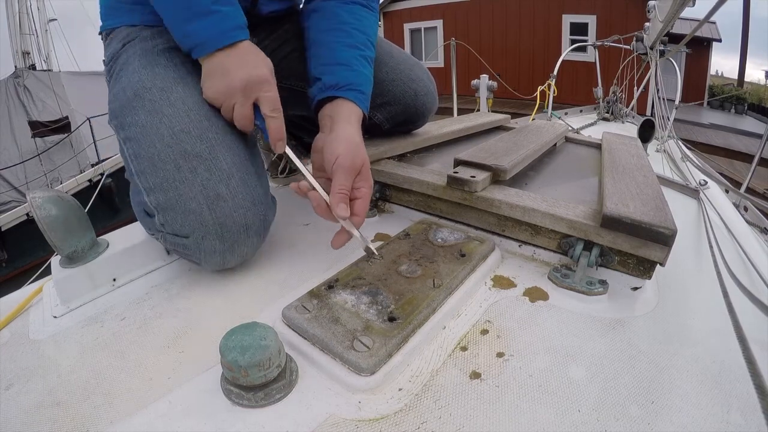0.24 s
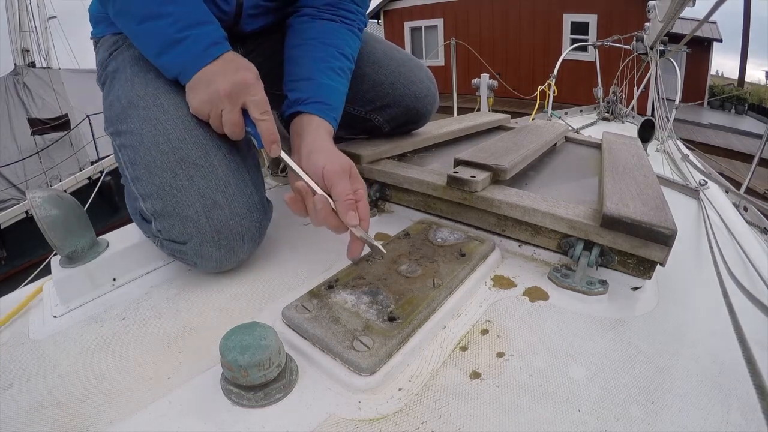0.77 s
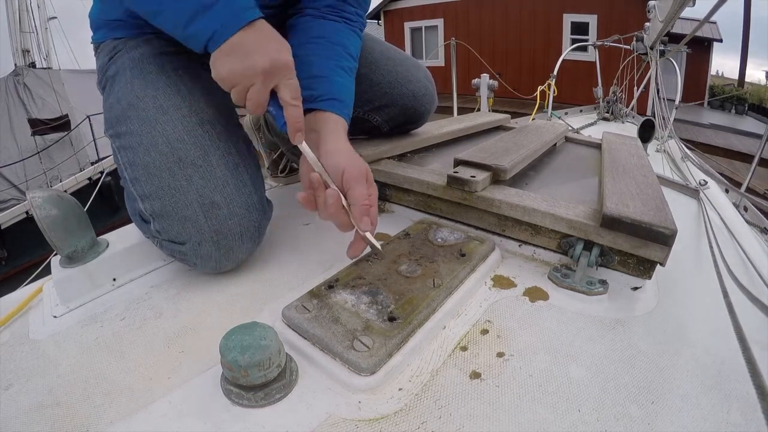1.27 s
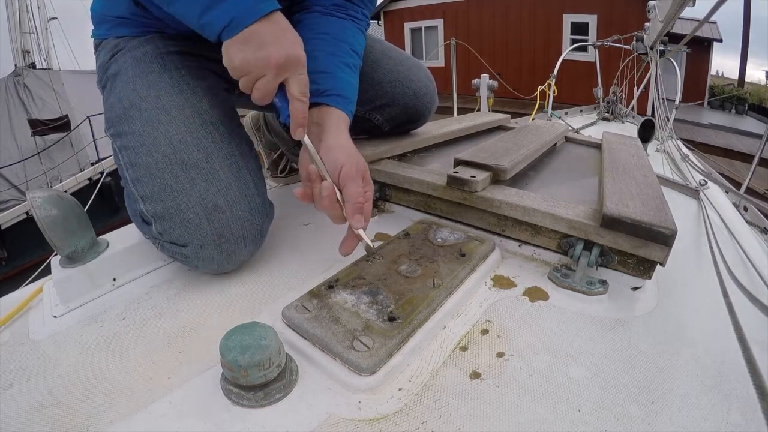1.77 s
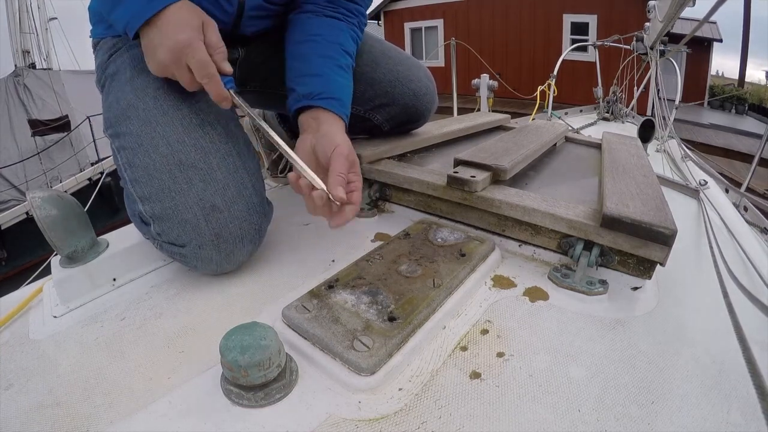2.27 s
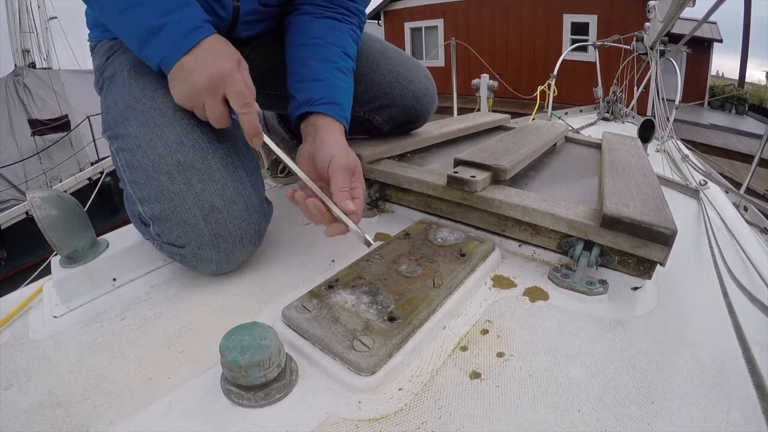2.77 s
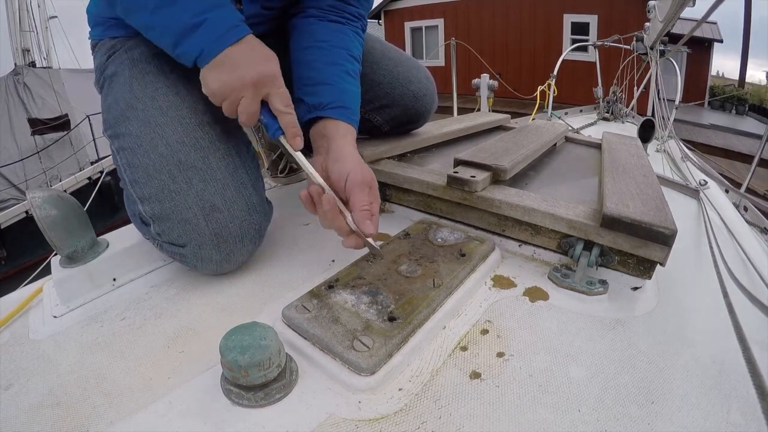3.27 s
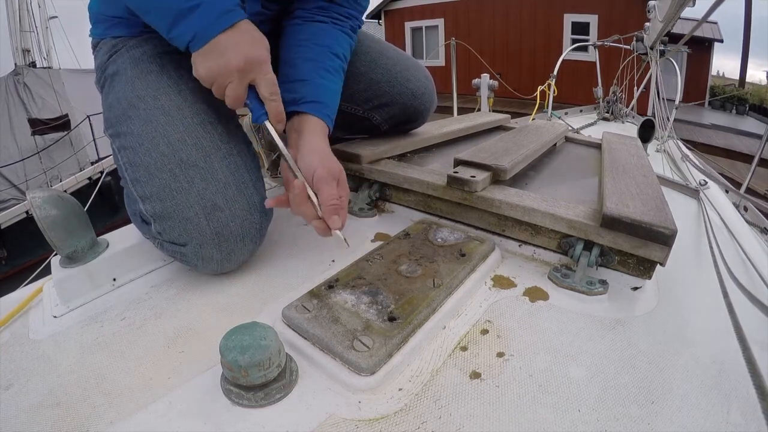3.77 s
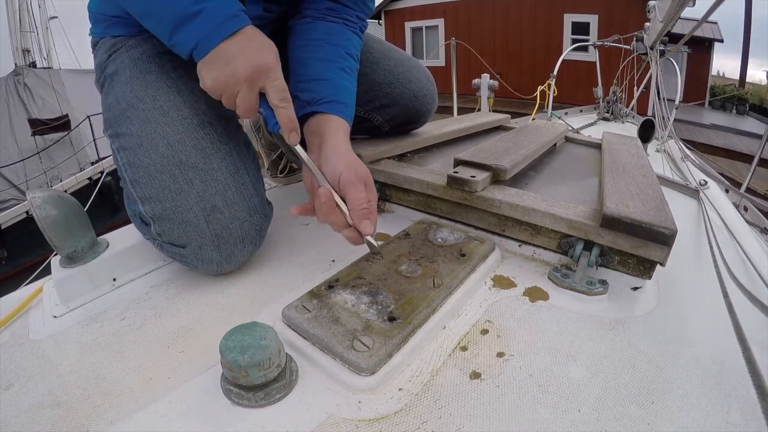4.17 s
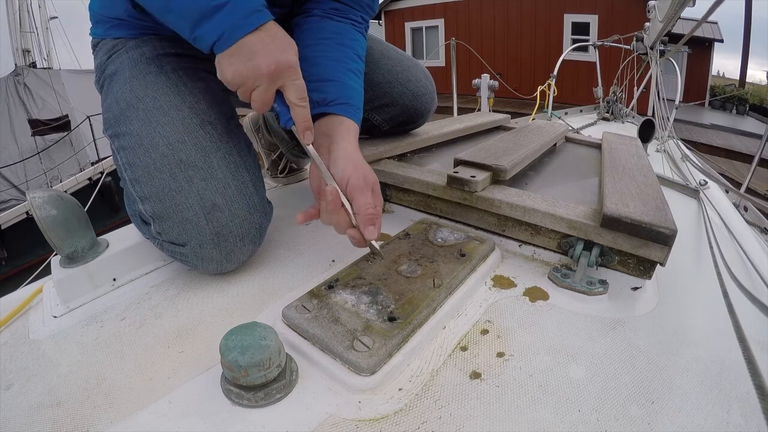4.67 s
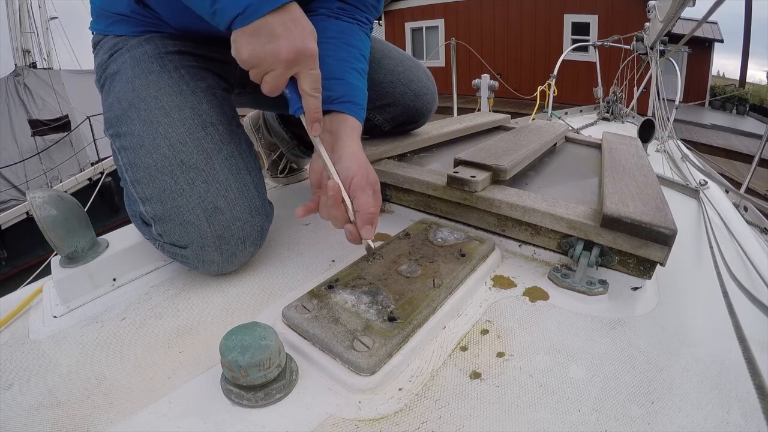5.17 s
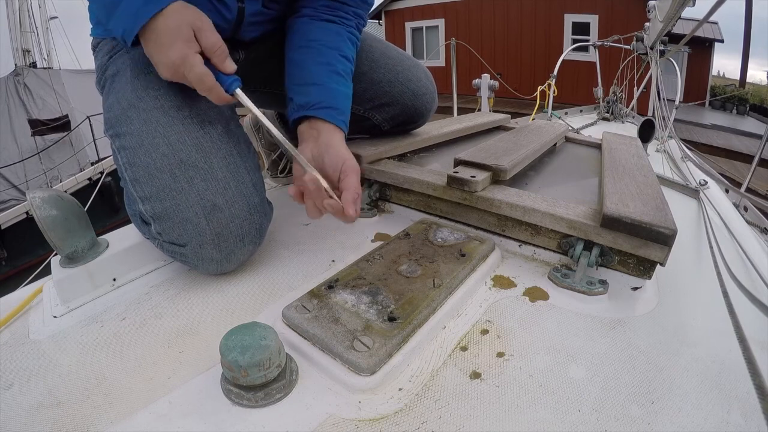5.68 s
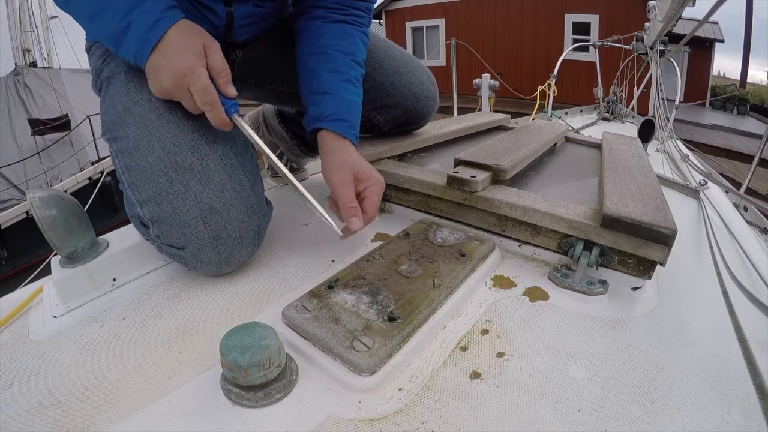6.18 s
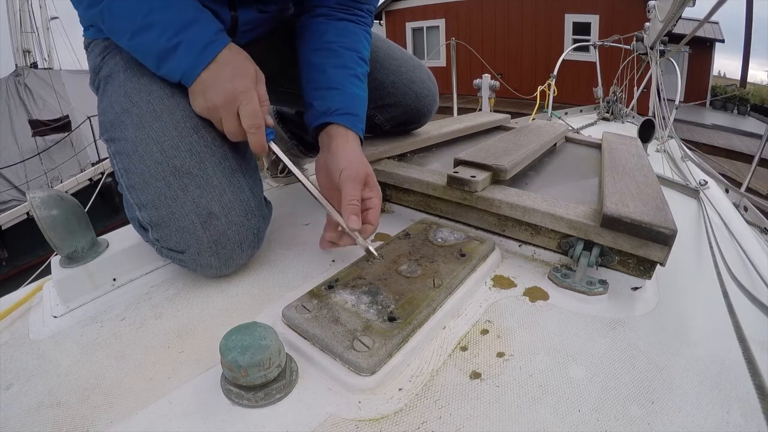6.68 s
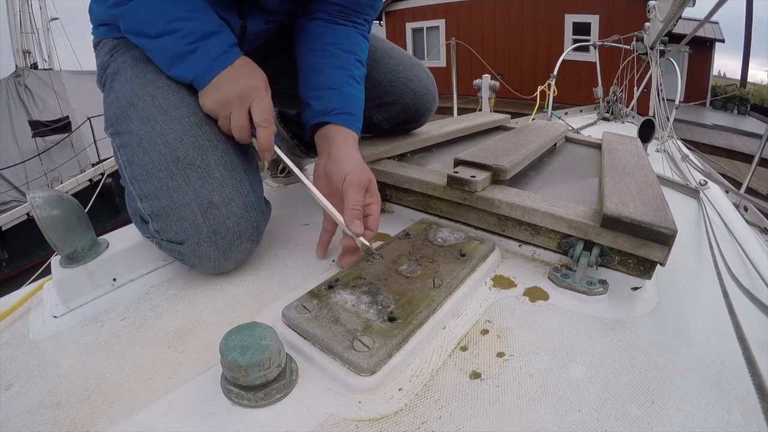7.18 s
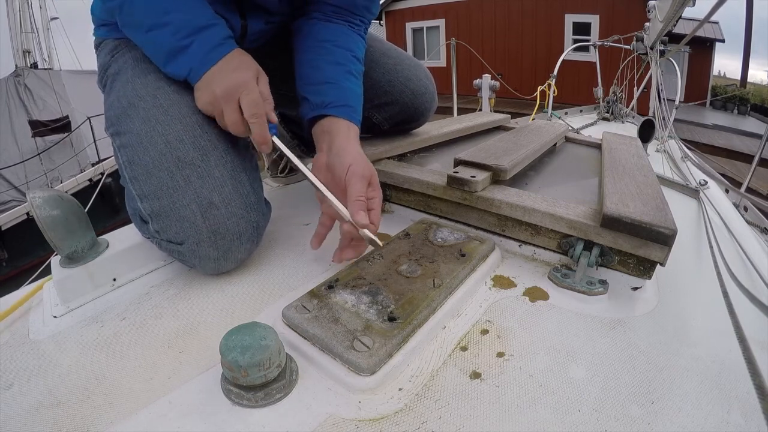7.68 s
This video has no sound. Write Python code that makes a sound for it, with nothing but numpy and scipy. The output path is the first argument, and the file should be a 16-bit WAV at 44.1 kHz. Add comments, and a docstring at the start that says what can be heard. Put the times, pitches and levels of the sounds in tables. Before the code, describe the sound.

A close microphone on a boat deck in open air. Low lumpy rumble and a soft distant roar run throughout, the roar slowly growing duller and slightly louder. Jacket fabric swishes at once and at 0.2 s; a strong, very deep thump lands at 0.4 s. A faint tick at 0.6 s precedes light gritty clicks around 1.0-1.1 s. Harder picks at 1.8 and 2.0 s knock the plate and hollow deck, followed by sleeve rustle, a barely audible singing of the shank and soft low thumps until 2.7 s. Faint touches come at 3.0 s, firm scraping knocks at 3.6-3.75, a click at 4.4, then sharp picks at 5.1-5.4. Fabric moves around 5.5-6.3 with another faint shank slide. Bright clicks cluster at 6.65-6.75; tiny flakes snap at 7.05 and 7.5, with a last small tick at 7.65. A faint wavering hum rises at the end.

```python
"""A flat screwdriver picks at corroded screw heads in a metal plate on a boat deck, worked by someone kneeling.
Skids of the tip are bursts of grit that ring the modes of the blade; blows ring the plate and the hollow deck.
The shank sings faintly through the fingers, flakes of corrosion snap off and a short dull tail follows the tool.
Jacket sleeves swish as filtered noise that swells with each stroke and jerks with each blow.
Under it lie a low rumble, soft thumps of deep sine, a distant roar of coloured noise and a faint wavering hum."""
import sys
import numpy as np
from scipy import signal
from scipy.fft import rfft, irfft
from scipy.io import wavfile
from scipy.ndimage import uniform_filter1d

SR = 44100
rng = np.random.default_rng(int(sys.argv[2]) if len(sys.argv) > 2 else 0)


def log_audio(samples):
    """Write samples as a 16-bit WAV file to the path given in sys.argv[1]."""
    # one column per channel
    frames = np.atleast_2d(samples).T
    # limit to full scale, then quantise
    limited = np.clip(frames, -1, 1)
    pcm = np.round(limited * 32767).astype(np.int16)
    wavfile.write(sys.argv[1], SR, pcm)


N = 350374
TIME = np.arange(N) / SR  # s

# modes of the blade with its tip pressed down, main mode first:
# (frequency [Hz], relative level [dB], t60 [s])
BLADE_MODES = [(3110, 2.5, 0.012), (3400, -16, 0.016), (4050, -20, 0.023), (4300, -8, 0.011),
               (4595, -11, 0.013), (5030, -19, 0.021), (6130, -23, .014), (6790, -18, 0.013),
               (9450, -42, 0.011)]
# blows of the tip on the plate, levels before trim:
# (time [s], level of the plate [dB], push on the deck [dB])
BLOWS = [(.969, -51, -44.5), (1.096, -49, -45.5), (1.831, -32, -32.5), (1.998, -36.5, -30.5),
         (2.007, -36, -37.5), (2.016, -34, -35), (3.011, -65, -45.5), (3.065, -62, -44), (3.579, -36, -30),
         (3.725, -34, -25.5), (3.741, -36, -32.5), (3.752, -38, -35.5), (4.389, -50, -46),
         (5.095, -59, -45.5), (5.2442, -33.5, -31), (5.361, -49, -36.5), (6.66, -37, -38),
         (6.728, -48.5, -45), (6.757, -46.5, -41)]


def amp(db):
    """Decibels to gain."""
    return 10 ** (np.asarray(db) / 20)


def unit(x):
    """Scales to rms 1."""
    return x / np.sqrt(np.mean(x ** 2) + 1e-20)


def held(x, seconds):
    """Scales a short sound to the energy of rms 1 held for so many seconds."""
    return x * np.sqrt(seconds * SR / (np.sum(x ** 2) + 1e-20))


def curve(rows, t):
    """A control curve at the times t."""
    return np.interp(t, *np.transpose(rows))


def colour(points, hz):
    """Gain of a spectrum table at the given frequencies, read along log frequency."""
    f, db = np.transpose(points)
    return amp(np.interp(np.log(hz + 1), np.log(f), db))


def tinted(x, spectrum):
    """Filters x by a spectrum table."""
    gain = colour(spectrum, np.fft.rfftfreq(len(x), 1 / SR))
    return irfft(rfft(x) * gain, len(x))


def add(mix, s, sound):
    """Mixes a sound in at time s."""
    part = mix[max(round(s * SR), 0):][:len(sound)]
    part += sound[:len(part)]


def drift(hz):
    """Slow random wander of rms 1, up to about hz changes a second."""
    lowpass = np.exp(-(np.fft.rfftfreq(N, 1 / SR) / hz) ** 2)
    return unit(irfft(rfft(rng.standard_normal(N)) * lowpass, N))


def ring(modes, bright_db=0, scatter_db=2, rise=0.00014, size=8000):
    """Modes that build up over a moment and die; each point of contact weights them a little differently."""
    hz, db, t60 = np.transpose(modes)[:, :, None]
    t = np.arange(size) / SR
    tilt_db = bright_db * np.log2(hz / hz[0])
    weight = amp(db + tilt_db + scatter_db * rng.standard_normal(hz.shape))
    swing = np.sin(2 * np.pi * (hz * t + rng.random(hz.shape)))
    decay = np.exp(-np.log(1000) * t / t60)
    return (weight * decay * swing).sum(0) * (1 - np.exp(-t / rise))


def grit(length, limit=1.7, size=1024, count=12):
    """Force on a skidding tip: a short dense noise burst, even in spectrum, with its peaks clipped."""
    contact = np.arange(size) / SR < length
    force = rng.standard_normal(size)
    # alternately flatten the spectrum and clip the peaks
    for _ in range(count):
        bins = rfft(force * contact)
        force = irfft(bins / (abs(bins) + 1e-9))
        force = np.clip(force / force[contact].std(), -limit, limit)
    return force * contact


def skid(length, db, bright_db, hz, contact_hz, ring_db, crunch_db, size=256):
    """Grit rings the blade and the screw edge that it bites, and crackles by itself; gives (delay s, sound) parts."""
    # breaking corrosion: (frequency [Hz], relative level per Hz before the skid's tilt [dB])
    crust_spectrum = [(700, -40), (1350, -15), (1900, -1), (2250, 3.5), (2600, 0.5), (3300, -7.5),
                      (4400, -9.5), (5300, -4.5), (6800, -19), (7800, -22), (15000, -31)]
    contact_t60 = 0.013  # s
    crust_trim_db = 3.0
    snap = 0.18  # share of the blade's brightness that tilts the crackle
    lasts = length + 0.0007  # s; the ring outlasts the skid

    modes = [(hz, *BLADE_MODES[0][1:])] + list(BLADE_MODES[1:])  # grip and pressure move the main mode
    blade = signal.fftconvolve(grit(length), ring(modes, bright_db, scatter_db=1.0, rise=0.00028))
    contact = signal.fftconvolve(grit(length), ring([(contact_hz, 0, contact_t60)], rise=0.00011))
    # a sharper catch snaps higher
    crackle = [(f, level + snap * bright_db * np.log2(f / hz)) for f, level in crust_spectrum]
    crust = tinted(np.pad(grit(length), size), crackle)
    return [(0, amp(db) * held(blade, lasts)),
            (0, amp(db + ring_db) * held(contact, lasts)),
            (-size / SR, amp(db + crunch_db + crust_trim_db) * held(crust, lasts))]


def rebounds():
    """Skid rows for the one light second touch of the tip after each blow that pushes the deck hard."""
    hard_db = -33  # push on the deck before trim
    delay, length = .022, .0015  # s
    relative_db = -17  # to the blow on the plate before trim
    bright_db = 3  # dB per octave
    edge_hz, edge_ring_db, edge_crunch_db = 2800, -8, -11  # the screw edge that a rebound meets
    main_hz = BLADE_MODES[0][0]
    return [(s + delay, length, blow_db + relative_db, bright_db, main_hz, edge_hz, edge_ring_db, edge_crunch_db)
            for s, blow_db, push_db in BLOWS if push_db > hard_db]


def skids():
    """Every skid and rebound of the tip, each a grit force driving blade, screw edge and crust."""
    # skids of the tip: (time [s], length [s], level [dB], brightness [dB per octave],
    # main mode of the blade [Hz], ring of the contact [Hz], level of that ring relative to the blade [dB],
    # crunch of the crust relative to the blade, before trim [dB])
    skid_rows = [(.621, .0032, -53, -3, 3050, 4600, -5, -7), (.9683, 0.0033, -61, 4, 3200, 2420, 4, 1),
                 (1.054, .0036, -56, -7, 3250, 2470, -6, -7),
                 (1.0938, 0.0017, -32, -5, 3250, 4500, -4.5, -15),
                 (1.0955, .0025, -42.5, -8, 3130, 1990, 4.5, -24),
                 (1.655, 0.018, -60, 3, 3270, 3640, -2, -5), (1.81, 0.011, -53.5, 5, 3080, 5540, -2, -9),
                 (1.8283, 0.0037, -38, -1, 2970, 3550, -5, -10),
                 (1.983, 0.0035, -47, 2, 3140, 4360, -7, -7), (1.9965, 0.0029, -41.5, 0, 3180, 3660, 0, -8),
                 (2.0046, 0.0079, -39.5, 8, 3100, 3730, -2, -7),
                 (2.012, .0072, -40, 12, 3050, 3830, -3, -5), (3.014, 0.0029, -56, 1, 3170, 1660, 5, -9),
                 (3.067, 0.0036, -56.5, -1, 3240, 1990, -9, -12),
                 (3.563, 0.0063, -50.5, 6, 3140, 4250, -4, -7),
                 (3.5766, 0.0023, -33, -9, 2980, 3900, -8, -7.5),
                 (3.725, 0.0014, -36, -4, 3050, 1930, -8, -12),
                 (3.737, 0.0094, -44, -5, 2900, 4500, -8, -3),
                 (3.747, .0068, -33.5, -12, 2940, 4500, -8, -8.5),
                 (4.388, 0.002, -42, -8, 3030, 1760, 0.5, -11),
                 (4.401, 0.012, -55.5, -6, 2960, 2020, -1, -14),
                 (4.992, .0034, -53.5, 0, 3150, 5030, -1.5, -9), (5.098, 0.022, -67, 10, 3090, 4890, 1, -9),
                 (5.234, .002, -44.5, 16, 3100, 4240, 1, -8),
                 (5.242, .0024, -31.5, -6, 2910, 1650, -12, -14),
                 (5.347, 0.014, -52, -1, 2880, 2230, -3, -6), (5.369, .0016, -36, 4, 2850, 4510, -6, -12),
                 (6.659, 0.0041, -32, 1, 3070, 4650, -5, -22),
                 (6.6634, 0.006, -33.5, -4, 3130, 4700, -6, -15),
                 (6.7258, .0019, -38.5, 17, 3190, 2200, -1, -8),
                 (6.731, .006, -43.5, 10, 3130, 1790, -.5, -7),
                 (6.7565, 0.0019, -48.5, -2, 3080, 4070, -3, -8),
                 (7.4904, 0.0026, -50.5, 23, 3000, 5300, -3, -17),
                 (7.6466, .0022, -50, -8, 2910, 3550, -11, -17)]
    out = np.zeros(N)
    for s, *row in list(skid_rows) + rebounds():
        for delay, sound in skid(*row):
            add(out, s + delay, sound)
    return out


def knocks(plate_trim_db=0.5, deck_trim_db=1.0):
    """The tip lands on the plate, which shakes the hollow deck under it; both ring in their own modes."""
    # modes of the plate: (frequency [Hz], relative level [dB], t60 [s])
    plate_modes = [(729, -4.5, 0.037), (919, 2, 0.034), (956, -1, 0.052), (1096, -12, 0.085),
                   (1164, 2, 0.03), (1480, -9, .025), (1714, -13, 0.038), (2030, -15, 0.045),
                   (2230, -14.5, 0.028)]
    # modes of the hollow deck: (frequency [Hz], relative level [dB], t60 [s])
    deck_modes = [(70.3, -1, 0.21), (103, -4.5, 0.1), (159, -1, 0.15), (220.8, -1.5, 0.12),
                  (282.4, -4.5, 0.13), (339, -8.5, 0.084), (382, -1, 0.091), (472.5, -7, 0.073)]
    out = np.zeros(N)
    for s, blow_db, push_db in BLOWS:
        plate = held(ring(plate_modes, scatter_db=4.0, rise=0.00067), 0.0087)
        deck = held(ring(deck_modes, scatter_db=4.0, rise=0.0011), 0.016)
        add(out, s, amp(blow_db + plate_trim_db) * plate)
        add(out, s, amp(push_db + deck_trim_db) * deck)
    return out


def slides(t60=0.011):
    """The shank slides through the fingers: light rubbing keeps one of its modes faintly singing."""
    # slides of the shank: (start [s], length [s], level before the fades [dB], ring [Hz])
    slide_rows = [(2, 0.59, -66, 4850), (6.073, 0.55, -63, 2980)]
    out = np.zeros(N)
    for s, length, db, hz in slide_rows:
        rub = rng.standard_normal(round(length * SR))
        sung = signal.fftconvolve(rub, ring([(hz, 0, t60)]))[:len(rub)]
        add(out, s, amp(db) * unit(sung) * np.hanning(len(rub)))
    return out


def flakes(length=0.0016, size=256):
    """Flakes of corrosion break off in tiny, dry, bright snaps, one of them along with a skid."""
    # flakes: (time [s], level [dB])
    flake_rows = [(1.539, -61), (7.046, -57), (7.491, -61)]
    # colour of a snap: (frequency [Hz], relative level per Hz [dB])
    snap_spectrum = [(2500, -30), (4500, -3), (7000, -3), (10000, 1), (15000, -10)]
    out = np.zeros(N)
    for s, db in flake_rows:
        snap = tinted(np.pad(grit(length), size), snap_spectrum)
        add(out, s - size / SR, amp(db) * held(snap, 0.0043))
    return out


def reflections(x, wet_db=-13, t60=0.06, dull_hz=3000, size=12000):
    """The deck and cabin scatter a short, dull tail into the open air: sparse random echoes that die away."""
    t = np.arange(size) / SR
    sparse = (rng.random(size) < .08) * (t > .003)
    taps = rng.standard_normal(size) * sparse * np.exp(-np.log(1000) * t / t60)
    taps = signal.lfilter(*signal.butter(1, dull_hz, fs=SR), taps / np.linalg.norm(taps))
    return amp(wet_db) * signal.fftconvolve(x, taps)[:N]


def swell(s, rise, fade):
    """A rounded hump of height 1 at time s, with its own rise and fade times."""
    return np.exp(-((TIME - s) / np.where(TIME < s, rise, fade)) ** 2)


def sleeve_levels():
    """Gains of swish and cloth: each stroke of the arms swells and fades, and each blow adds a brief jerk."""
    # strokes of the arms, levels before trim: (fastest moment [s], swell [s], fade [s],
    # swish [dB], body of the cloth relative to the swish [dB])
    stroke_rows = [(.01, .1, 0.15, -58, 7.5), (.22, 0.053, 0.089, -53.5, 6), (.49, 0.7, 0.22, -65, 7.5),
                   (1.335, 0.086, .11, -59, 3.5), (1.68, 0.023, 0.038, -67.5, 13.5),
                   (1.83, 0.036, 0.028, -67, 3), (2.1, .11, .23, -56.7, 3), (2.51, .09, 0.11, -67.5, 5),
                   (2.69, 0.092, 0.17, -59.5, 2), (2.86, 0.18, 0.19, -61, 3), (3.375, .115, 0.15, -60.5, 6),
                   (3.77, 0.023, 0.11, -57.5, 4), (3.99, .07, .115, -65, 3.5),
                   (4.723, 0.058, .08, -58.5, 6.5), (4.85, .05, 0.14, -67.5, 5),
                   (5.46, 0.12, 0.19, -56.5, 3), (5.845, 0.11, 0.086, -59.5, 3),
                   (5.958, 0.018, .035, -57, -3), (6.32, 0.24, .145, -58, 2), (6.54, .085, 0.092, -62, 5.5),
                   (6.86, 0.22, 0.38, -73, 9), (7.22, 0.047, 0.16, -64, 2.5), (7.83, 0.23, .2, -65, 7)]
    still_swish_db, still_cloth_db = -74, -67  # before trim; the sleeves never quite rest
    jolt_swish_db, jolt_cloth_db = -41, -23  # before trim, relative to the push on the deck before trim
    jolt_swell, jolt_fade = 0.0059, .035  # s

    moves = [(s, rise, fade, db, db + body_db) for s, rise, fade, db, body_db in stroke_rows]
    moves += [(s, jolt_swell, jolt_fade, push_db + jolt_swish_db, push_db + jolt_cloth_db)
              for s, _, push_db in BLOWS]
    # the moves add as powers
    swish, cloth = amp(still_swish_db) ** 2, amp(still_cloth_db) ** 2
    for s, rise, fade, swish_db, cloth_db in moves:
        power = swell(s, rise, fade) ** 2
        swish = swish + amp(swish_db) ** 2 * power
        cloth = cloth + amp(cloth_db) ** 2 * power
    return np.sqrt(swish), np.sqrt(cloth)


def sleeves(swish_trim_db=1, cloth_trim_db=-2, flutter_db=1.0):
    """Smooth fabric slides on itself: a fine hiss over a duller rub, fluttering together as the folds pass."""
    # fine hiss of the fabric: (frequency [Hz], relative level per Hz [dB])
    swish_spectrum = [(1500, -25), (3000, -8), (4800, -2.5), (6500, 0), (8500, -2), (11000, -2.5),
                      (13500, -2), (15500, -5.5)]
    # duller rub of the cloth: (frequency [Hz], relative level per Hz [dB])
    cloth_spectrum = [(500, -35), (1200, 1.5), (2200, -1.5), (3100, 2), (3900, -0.5), (4700, 1), (6000, -3),
                      (8500, -11.5), (15000, -29)]
    swish_gain, cloth_gain = sleeve_levels()
    swish = swish_gain * amp(swish_trim_db) * unit(tinted(rng.standard_normal(N), swish_spectrum))
    cloth = cloth_gain * amp(cloth_trim_db) * unit(tinted(rng.standard_normal(N), cloth_spectrum))
    return (swish + cloth) * amp(flutter_db * drift(58))


def thumps():
    """A few cycles of deep pressure that swell and die."""
    # soft thumps: (middle [s], length [s], frequency [Hz], peak level [dB])
    thump_rows = [(0.218, 0.064, 202, -40.5), (0.27, 0.065, 39, -28.5), (0.415, 0.082, 36.8, -10.5),
                  (0.457, 0.039, 45.3, -21), (0.519, 0.13, 36, -30), (1.764, 0.098, 66, -33),
                  (1.868, 0.061, 66.4, -23.5), (2.283, 0.089, 35.6, -28), (2.377, 0.17, 36.4, -25),
                  (2.402, 0.036, 65.4, -27.5), (2.589, 0.15, 42.2, -25.5), (2.59, 0.077, 86, -34.5),
                  (2.725, 0.069, 41.5, -24.5), (3.753, .09, 40.4, -29.5), (5.268, 0.13, 43.7, -27.5),
                  (5.642, 0.075, 31.8, -30)]
    out = np.zeros(N)
    for s, length, hz, db in thump_rows:
        t = np.arange(-length / 2, length / 2, 1 / SR)
        hump = np.cos(np.pi * t / length) ** 2
        add(out, s - length / 2, amp(db) * hump * np.sin(2 * np.pi * hz * t))
    return out


def rumble(trim_db=2.5):
    """Lumpy low rumble: dark noise whose level wanders."""
    # colour of the rumble: (frequency [Hz], relative level per Hz [dB])
    rumble_spectrum = [(12, -4.5), (25, -3), (37, 4), (55, -1), (80, -6), (110, -7), (150, -13.5),
                       (230, -21), (350, -26), (600, -28.5), (1500, -56.5)]
    # course of the rumble: (time [s], level before trim and wander [dB])
    rumble_level = [(0, -44), (.45, -42), (1.3, -46.5), (1.9, -41), (2.9, -47), (3.65, -41.5), (4.8, -46),
                    (5.3, -42), (6, -47), (6.7, -42.5), (7.94, -45)]
    level_db = curve(rumble_level, TIME) + trim_db + 1.12 * drift(4.0)
    return amp(level_db) * unit(tinted(rng.standard_normal(N), rumble_spectrum))


def noise(spectrum, patchy_db, shift, size):
    """Noise of rms 1 with a given spectrum, drifting patches and a sliding colour."""
    overlap = size * 3 // 4
    hz, t, bins = signal.stft(rng.standard_normal(N), SR, nperseg=size, noverlap=overlap)
    patches = uniform_filter1d(rng.standard_normal(bins.shape), size=14, axis=0)  # across frequency
    patches = unit(uniform_filter1d(patches, size=10, axis=1))  # along time
    bins = bins * colour(spectrum, hz[:, None] / curve(shift, t)) * amp(patchy_db * patches)
    return unit(signal.istft(bins, nperseg=size, noverlap=overlap)[1][:N])


def roar(trim_db=2):
    """A far roar: patchy noise that slowly darkens as its spectrum slides down."""
    # colour of the roar: (frequency before the shift [Hz], relative level per Hz [dB])
    roar_spectrum = [(100, 1), (300, -2), (480, -4.5), (700, 0.5), (950, 1.5), (1300, -5), (2000, -12.5),
                     (3000, -19.5), (6000, -29.5), (15000, -50)]
    # slide of the colour: (time [s], factor on the roar's frequencies [ratio])
    roar_shift = [(0, 1.087), (4.5, 0.99), (6, 0.91), (7.9, 0.92)]
    # course of the roar: (time [s], level before trim [dB])
    roar_level = [(0, -53), (.6, -54.5), (1.6, -52.5), (2.8, -52.5), (5.2, -51), (7.94, -50)]
    far = noise(roar_spectrum, patchy_db=0.9, shift=roar_shift, size=2048)
    return amp(curve(roar_level, TIME) + trim_db) * far


def hum():
    """A faint hum of a few sines, each wavering in pitch, all wavering in level together."""
    # partials of the hum: (middle frequency [Hz], relative level [dB])
    hum_partials = [(98, -5.5), (157, -1), (211, -14.5)]
    # course of the hum: (time [s], level before the waver [dB])
    hum_level = [(0, -67.5), (3.8, -54), (6.3, -56.5), (7.2, -58.5), (7.55, -50.5), (7.9, -47)]
    tone = np.zeros(N)
    for hz, db in hum_partials:
        pitch = hz * (1 + 0.0126 * drift(5.87))
        tone += amp(db) * np.sin(2 * np.pi * np.cumsum(pitch) / SR)
    return amp(curve(hum_level, TIME) + 2 * drift(5)) * unit(tone)


def scene():
    """The tool close by with its short tail, the worker's sleeves and the harbour air."""
    tool = skids() + knocks() + slides()
    worker = tool + reflections(tool) + flakes() + sleeves()
    background = thumps() + rumble() + roar() + hum()
    return (worker + background)[None]


def record(dry):
    """Limits the band with a steep linear-phase low-pass."""
    edge_hz = 15400
    lowpass = signal.firwin(511, edge_hz, window=("kaiser", 9), fs=SR)
    return signal.oaconvolve(dry, lowpass[None], "same")


dry = scene()
out = record(dry)
log_audio(out)
```